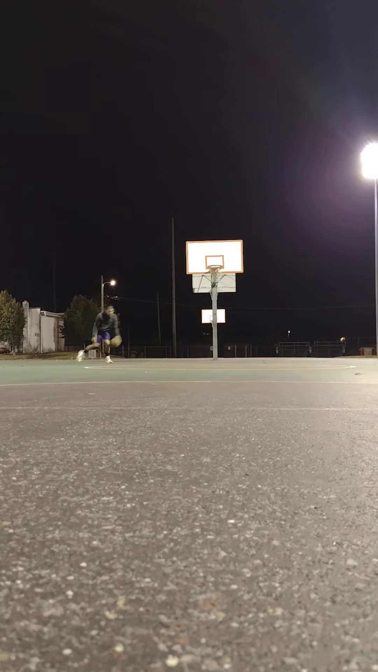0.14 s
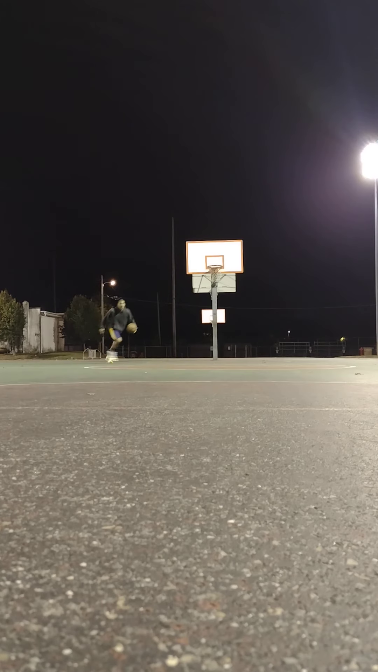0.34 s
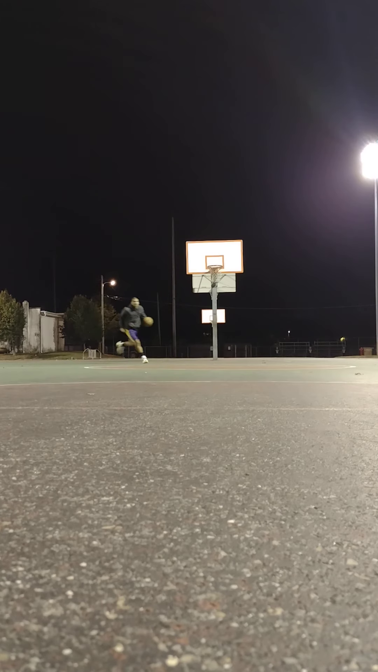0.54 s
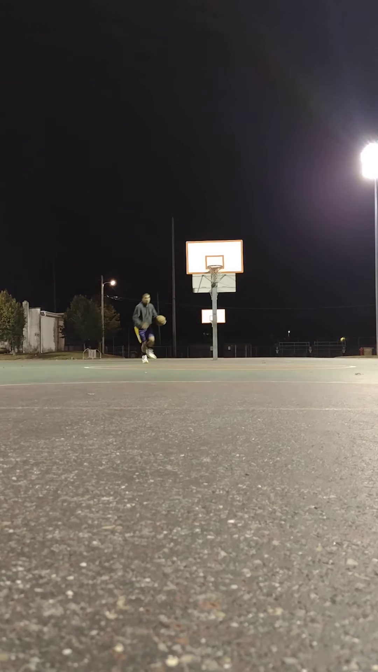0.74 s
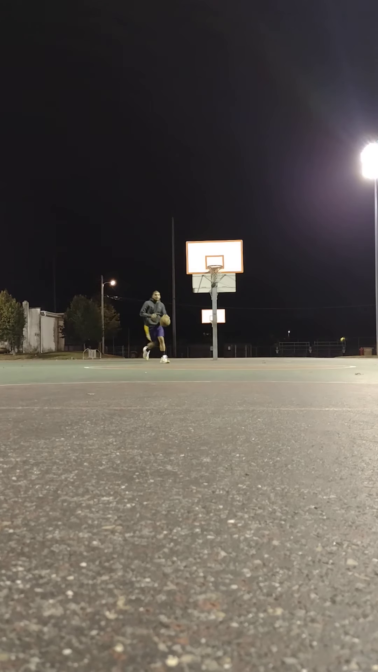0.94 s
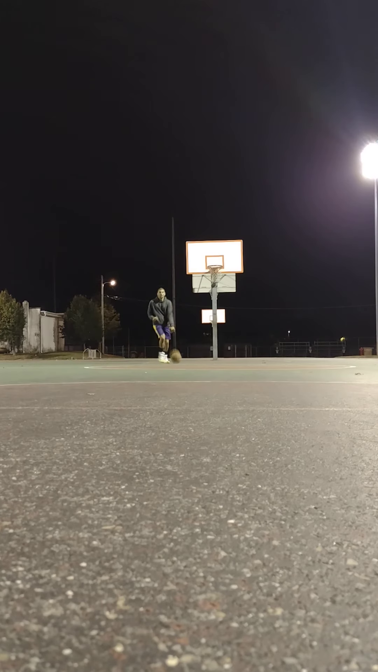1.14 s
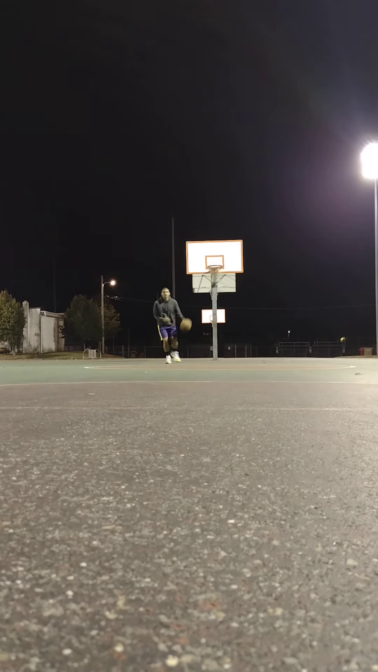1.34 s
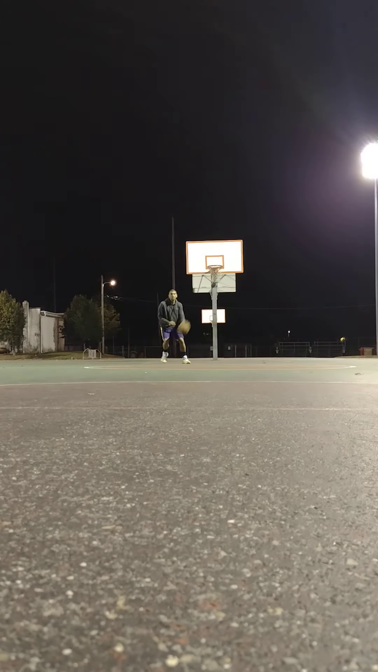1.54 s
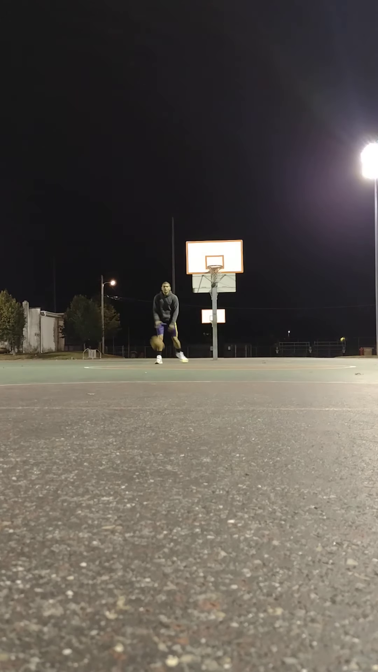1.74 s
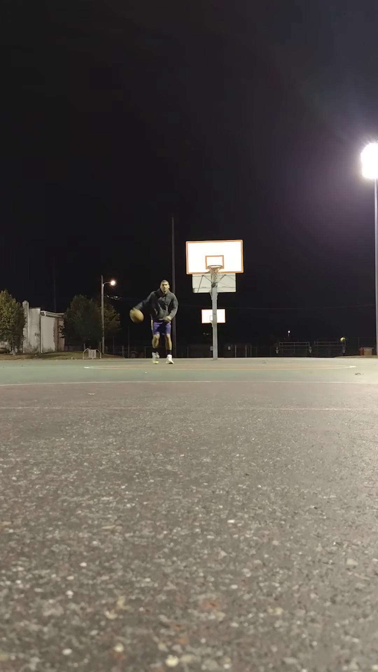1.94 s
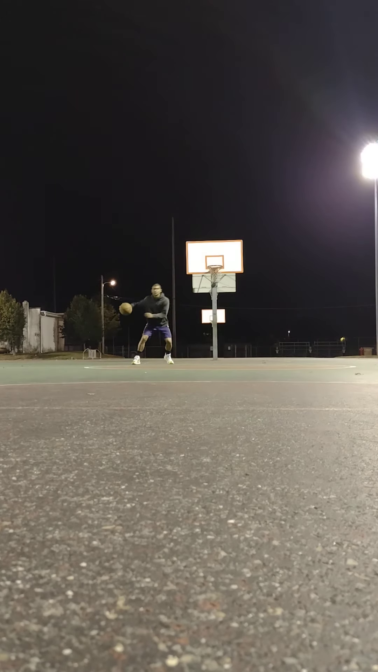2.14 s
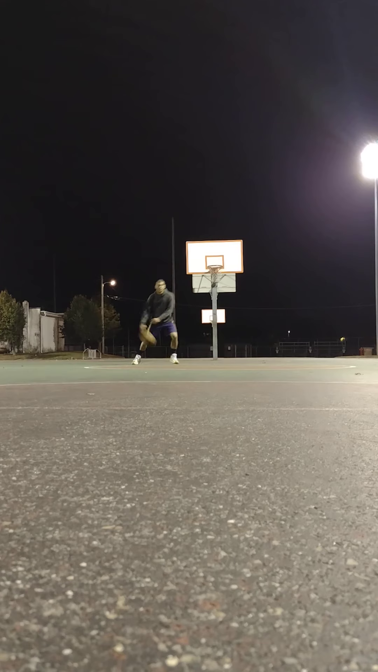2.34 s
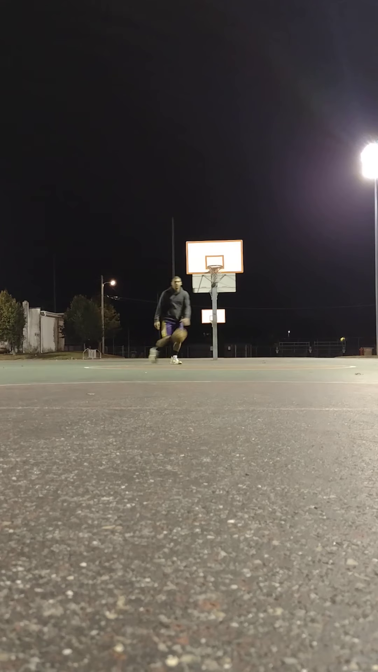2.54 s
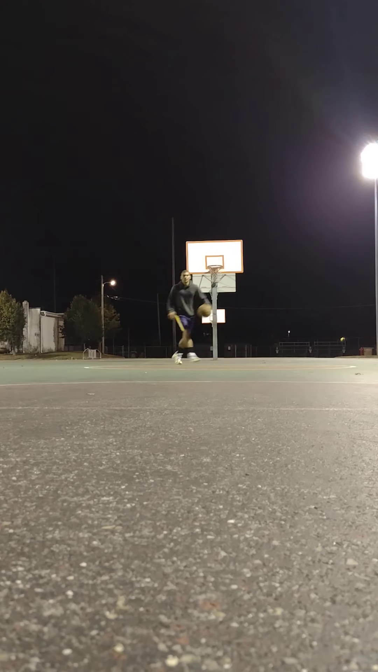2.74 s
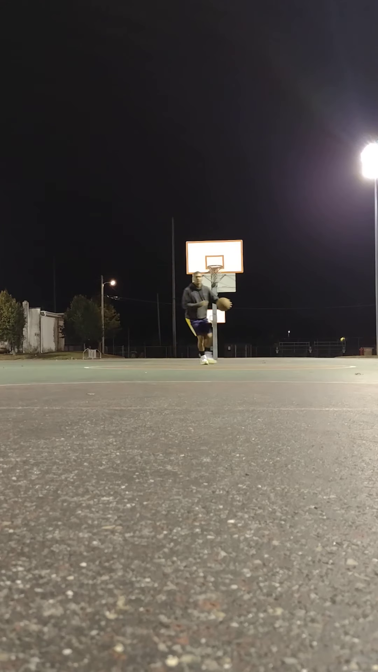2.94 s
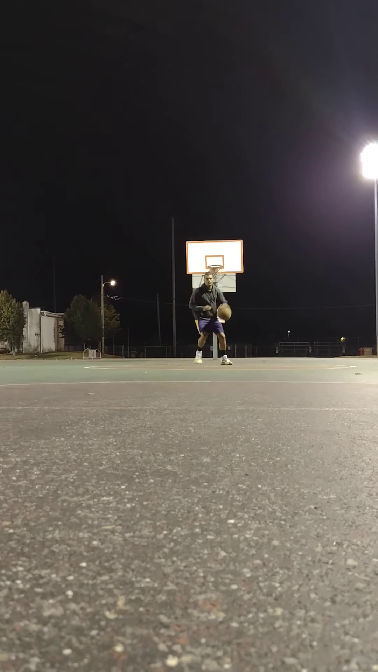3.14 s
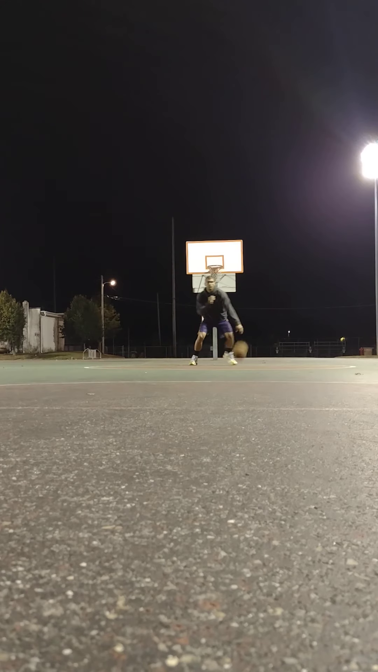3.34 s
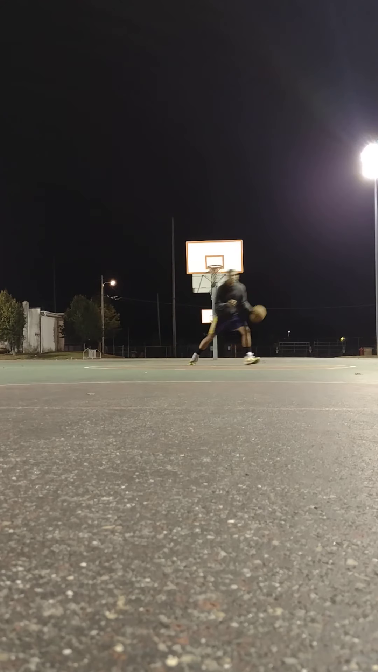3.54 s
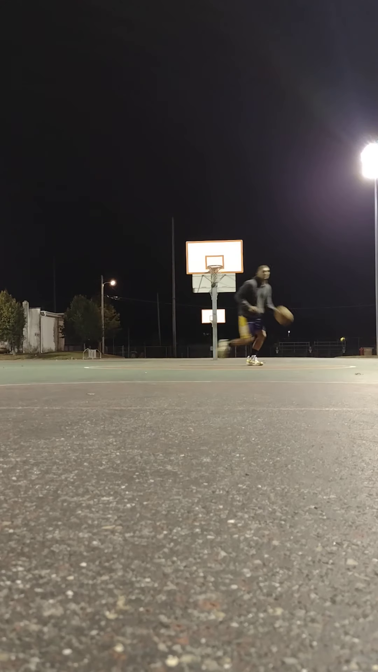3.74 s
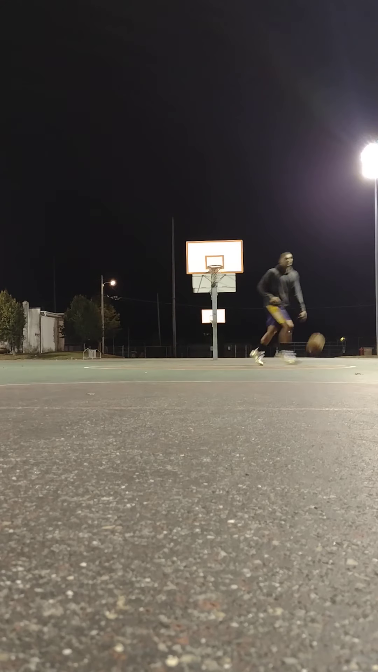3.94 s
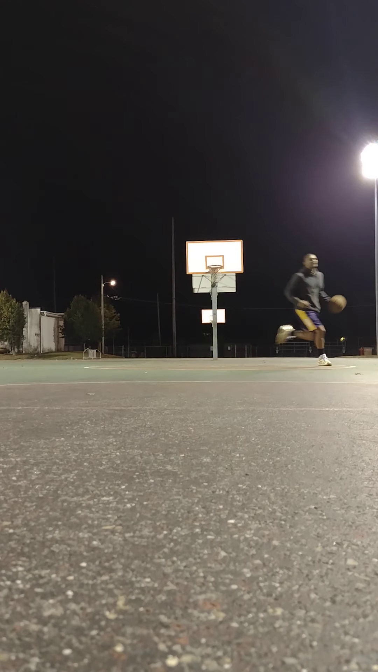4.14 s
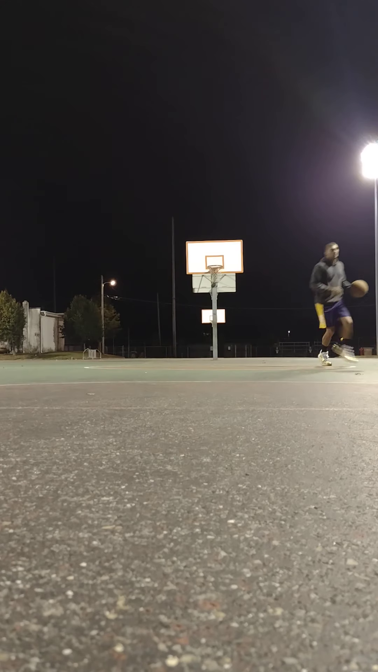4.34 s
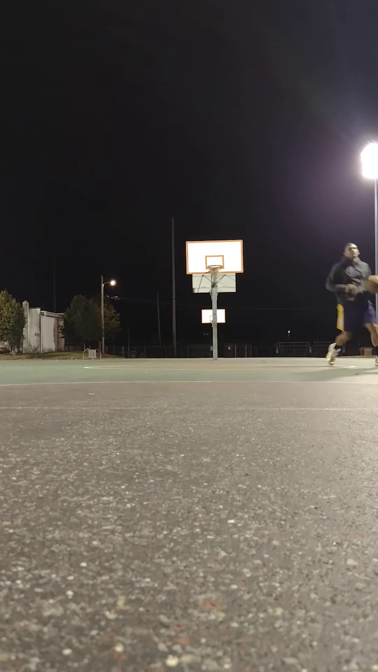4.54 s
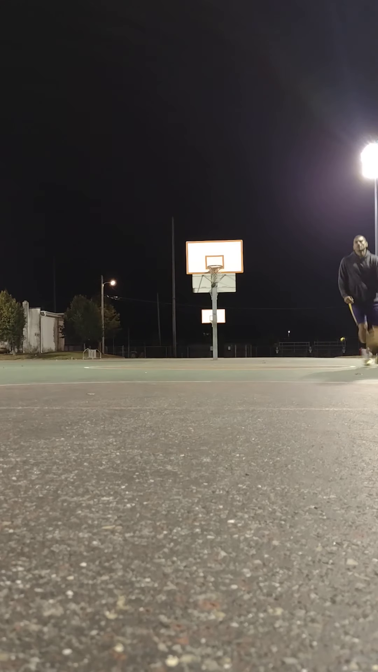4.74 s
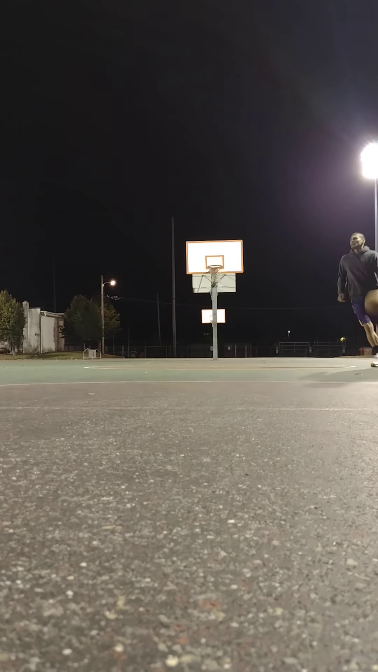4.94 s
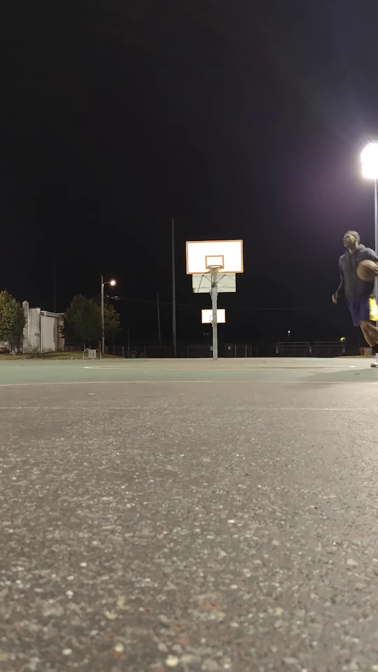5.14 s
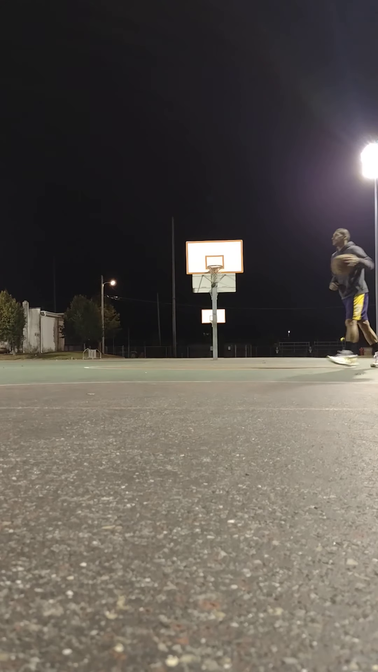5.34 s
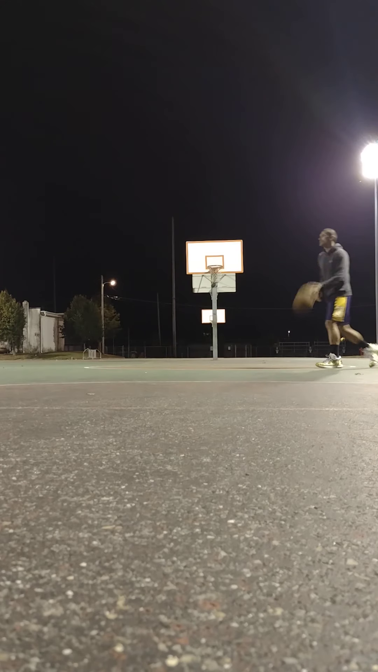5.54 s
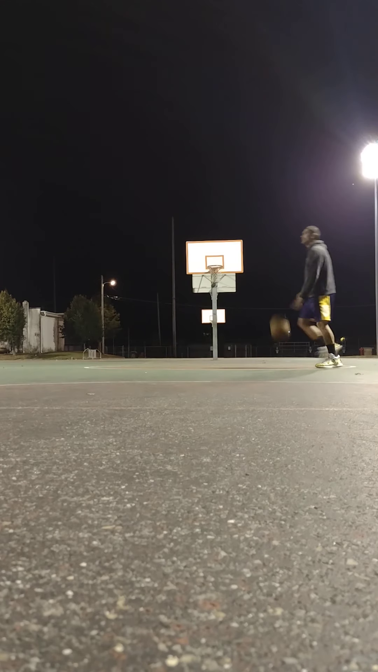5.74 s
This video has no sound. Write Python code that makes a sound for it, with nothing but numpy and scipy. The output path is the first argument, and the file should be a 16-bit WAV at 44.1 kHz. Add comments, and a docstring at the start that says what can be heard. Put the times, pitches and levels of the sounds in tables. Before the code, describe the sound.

One soft, dull bounce opens, then a pause of over a second before quicker basketball dribbles with thumping, ringing slaps. Shoes chirp in very short bursts during the footwork, strongest near 1.6, 2.2 and 3.35 seconds, then stop; later bounces are louder. A light hand slap comes late. Open court with reflections from fences and buildings, low traffic murmur, faint insect song and hiss; distant ground-level stereo pickup.

```python
"""An outdoor asphalt court at night: a basketball is dribbled some metres from a microphone on the ground.
Each bounce adds fading tones of the squashed ball and of the air in it to a smack and a falling crack.
Rubber soles squeak with wavering tones, scuff with short noise and tick on grit.
Fences and buildings send back echoes, made from delayed copies and fading noise.
Far traffic hums and insects sing, both made from filtered noise."""
import sys
import numpy as np
from scipy import signal
from scipy.fft import rfft, irfft, next_fast_len
from scipy.io import wavfile
from scipy.ndimage import uniform_filter1d, map_coordinates

SR = 44100
rng = np.random.default_rng(int(sys.argv[2]) if len(sys.argv) > 2 else 0)


def put_to_file(sound):
    """Save the sound as 16-bit audio at rate SR, in the file named by the first command-line argument."""
    columns = np.atleast_2d(sound).T  # one column per channel
    safe = np.clip(columns, -1, 1)
    whole_steps = np.round(safe * 32767)
    wavfile.write(sys.argv[1], SR, whole_steps.astype(np.int16))


def magnitude_from_level(level_db):
    """Linear magnitude for a level in decibels (20 dB per decade)."""
    exponent = np.asarray(level_db, float) / 20
    return 10 ** exponent


N = 259308  # samples, about 5.88 s

# How far traffic comes and goes. Each row: time in seconds, rumble level in dB, tyre roar level in dB.
TRAFFIC_LEVELS = [(0.0, -56, -56), (0.23, -50, -52), (0.6, -55, -58.5), (1.46, -51.5, -53.5),
                  (1.67, -57, -57.5), (2.21, -54.5, -56), (2.7, -57.5, -57.5), (3.31, -55, -56),
                  (4.22, -56.5, -59), (4.63, -60, -60.5), (4.93, -57, -59), (5.34, -58.5, -60),
                  (5.88, -55, -61)]
# Tone colour of the low rumble. Each row: frequency in Hz, relative level in dB per Hz.
RUMBLE_SPECTRUM = [(12, -50), (20, -21.5), (83, -1.5), (107, -1), (168, -2.5), (258, -6), (357, -25),
                   (400, -18), (520, -49), (880, -120)]
# Tone colour of the tyre roar. Each row: frequency in Hz, relative level in dB per Hz.
ROAR_SPECTRUM = [(180, -28), (300, -4.5), (451, -4.5), (522, -6.5), (565, -7.5), (707, -4), (1210, -7),
                 (3530, -28.5), (4410, -32), (7000, -45.5), (9100, -76.5), (15400, -120)]
# How alike left and right are in spread-out sound. Each row: frequency in Hz, likeness from 0 to 1.
LEFT_RIGHT_LIKENESS = [(30, .975), (130, .99), (290, .98), (640, .89), (1400, .72), (3100, .25), (6800, 0)]
# Tone colour of the microphone noise. Each row: frequency in Hz, relative level in dB per Hz.
HISS_SPECTRUM = [(1500, -120), (3000, -4.5), (6000, -1), (9000, -3), (12000, -6.5), (16000, -4)]

# Ball blows on the ground, all strengths relative. Each row: start in seconds, squash in dB,
# squash overtone in dB, ring in dB, crack in dB, brightness in dB.
BOUNCES = [(0.1673, -32.5, -5, -43, -42, -24), (1.317, -27.5, 3.5, -37, -33, 2),
           (1.837, -28.5, 3.5, -37.5, -32, -1.5), (2.5896, -30, 2, -40.5, -32.5, -5.5),
           (3.4716, -24, 1, -33.5, -23, -7.5), (4.008, -26.5, 2.5, -34.5, -36.5, 8),
           (4.8927, -21.5, 4, -28, -30, 2.5), (5.78, -24, -8, -34, -25.5, -9)]
# A hand's blow on the ball. One row: squash in dB, squash overtone in dB, ring in dB, crack in dB,
# brightness in dB, how many times quicker than a bounce.
PALM_BLOW = (-34, -2.5, -50, -36.5, -18, 2.81)
PALM_TIME = 4.6177  # seconds
# The ball squashing. Each row: frequency in Hz, relative level in dB, time to fade by 60 dB in seconds;
# a quicker blow raises the frequency and shortens the fade.
SQUASH_MODES = [(101.27, 1.5, 0.073), (228, -4, 0.0706), (338.7, -20.5, 0.11)]
# Air ringing in the ball, before small random changes. Each row: frequency in Hz, relative level in dB,
# time to fade by 60 dB in seconds.
AIR_MODES = [(451, -13.5, 0.049), (751.4, -1.5, 0.01667), (1028, -13, 0.042), (1164.6, -1.5, 0.019),
             (1712, -0.5, 0.0097), (2294, -8, 0.017)]
# Dull slaps after a bounce: wall echoes, and at 1.9023 s probably a footstep. Each row: time in seconds
# (they start 1 ms earlier), level against the bounce in dB before dulling.
DULL_SLAPS = [(.198, -8), (1.343, -12.5), (1.864, -10.5), (1.9023, -8), (2.624, -8.5), (4.062, -13.5),
              (4.926, -19.5), (5.806, -28)]
# Long thin tones after some bounces. Each row: frequency in Hz, relative level in dB.
THIN_TONES = [(2810, 0), (5860, -16)]
# Faint thin tones after some bounces; the one from 4.897 s stops suddenly, perhaps at a catch.
# Each row: start in seconds, length in seconds, starting level in dB.
THIN_TONE_TIMES = [(.17, 0.079, -75.5), (2.6, 0.29, -77), (4.897, 0.26, -68), (5.79, 0.039, -80)]

# Where the player is. Each row: time in seconds, lead of the left port in microseconds,
# left-right level difference in dB before PORT_SHADING multiplies it.
PLAYER_POSITION = [(0, 34.6, 0.77), (3.3, 34, 0.8), (5.88, 7.9, 0.7)]
# The body of the recorder shades one port. Each row: frequency in Hz, multiplier of the left-right dB.
PORT_SHADING = [(200, 0.5), (700, 3.5), (1500, 4), (3000, 6.5), (6000, 0.56), (12000, 1.5)]
# How long scattered echoes last. Each row: frequency in Hz, time to fade by 60 dB in seconds.
COURT_FADE = [(100, 0.847), (1000, 0.62), (4000, 1), (12000, 0.79)]

# Grit under a sole. Each row: start in seconds, peak level in dB before its quick onset, frequency in Hz.
TICKS = [(0.432, -56, 9030), (1.1883, -58, 9080), (2.0192, -47, 9200), (2.1874, -65, 11450),
         (2.1928, -49, 9080), (2.7094, -58.5, 9300), (2.9896, -55.5, 8574), (4.176, -50.5, 3500),
         (5.845, -67.5, 3500)]
# Soles dragging. Each row: start in seconds, length in seconds, level in dB before fading in and out,
# centre frequency in Hz.
SCUFFS = [(1.082, 0.0131, -63, 2840), (2.396, 0.066, -60, 8300), (2.556, 0.033, -56, 6760),
          (3.136, 0.098, -65, 4680), (3.681, 0.0556, -61.5, 5140)]
# A sole bites, swells and lets go. Each row: start in seconds, length in seconds, peak level in dB,
# first frequency in Hz, last frequency in Hz, roughness from 0 to 1.
SQUEAKS = [(1.401, 0.019, -43, 4450, 4422, 0.4), (1.58, .042, -25, 3177, 3494, 0.6),
           (2.097, 0.028, -38.5, 4664, 3481, 0.47), (2.246, 0.0427, -28, 3507, 3278, .8),
           (2.375, 0.046, -49.5, 4200, 3208, 0.6), (3.197, .029, -33, 3059, 3817, 0.54),
           (3.35, 0.04566, -23, 3453, 3317, .8), (3.484, 0.0519, -42.5, 3400, 4590, 0.8)]
# The sole slides on faintly. Each row: start in seconds, length in seconds, peak level in dB,
# first frequency in Hz, last frequency in Hz, roughness from 0 to 1.
SLIDES = [(1.44, 0.0756, -60.5, 4540, 4510, .15), (1.55, .03, -70.5, 8600, 8700, 0.146),
          (1.63, 0.0624, -49.5, 3750, 3710, 0.98), (2.41, 0.028, -53.5, 3584, 2843, 0.654),
          (2.44, 0.12, -63, 3960, 3822, 0.79), (3.525, .025, -45, 4510, 4440, 0.99),
          (3.572, 0.0442, -53, 4480, 3727, 0.207)]
# Swell of a squeak. One row: share of the length before the peak, rise in dB, sharpness, fall in dB.
SQUEAK_SWELL = (0.625, 36.94, 3.216, 28)
# Swell of a slide. One row: share of the length before the peak, rise in dB, sharpness, fall in dB.
SLIDE_SWELL = (.15, 6, 1.5, 12)
# Wall echoes of the squeaks. Each row: delay in seconds, level in dB before random changes.
WALL_ECHOES = [(.022, -23), (.031, -23), (.05, -26.5), (.068, -29), (.09, -33)]


def unit(x):
    """Scales a sound to an rms (average strength) of 1."""
    return x / np.sqrt(np.mean(x ** 2) + 1e-20)


def along(points, hz):
    """Reads a (Hz, value) curve on a logarithmic frequency axis."""
    f, v = np.transpose(points)
    return np.interp(np.log(hz + 1), np.log(f + 1), v)


def at(points, s):
    """Reads every column after the time column, at the times s."""
    times, *cols = np.transpose(points)
    return [np.interp(s, times, c) for c in cols]


def wobble(rate, size=N):
    """A smooth random curve with the given number of random points a second."""
    points = rng.standard_normal(int(size * rate / SR) + 4)
    return map_coordinates(points, [np.arange(size) * rate / SR])


def filtered(x, response):
    """Shapes a sound by a complex response that depends on frequency."""
    m = next_fast_len(x.shape[-1] + 4096)
    return irfft(rfft(x, m) * response(np.fft.rfftfreq(m, 1 / SR)), m)[..., :x.shape[-1]]


def rush(spectrum, patchy_db):
    """Stereo noise of rms 1, with louder and softer patches across time and frequency."""
    z = signal.stft(rng.standard_normal((2, N)), nperseg=512)[2]
    patches = uniform_filter1d(rng.standard_normal(z.shape[1:]), size=5, axis=0)
    patches = uniform_filter1d(patches, size=10, axis=1)
    pair = signal.istft(z * magnitude_from_level(patchy_db * unit(patches)), nperseg=512)[1][:, :N]

    def middle_and_side(hz):
        # this angle gives left and right the wanted likeness
        angle = np.arccos(np.clip(along(LEFT_RIGHT_LIKENESS, hz), -1, 1)) / 2
        return magnitude_from_level(along(spectrum, hz)) * [np.cos(angle), np.sin(angle)]

    mid, side = filtered(pair, middle_and_side)
    return unit(np.array([mid + side, mid - side]))


def night():
    """Far traffic in two noise layers, and a narrow band of insect song stronger on the left."""
    rumble_db, roar_db = at(TRAFFIC_LEVELS, np.arange(N) / SR)
    rumble = magnitude_from_level(rumble_db + 0.83 * wobble(9.8)) * rush(RUMBLE_SPECTRUM, patchy_db=1.5)
    roar_db = roar_db + 0.8 * wobble(5.7)
    roar = magnitude_from_level(roar_db) * rush(ROAR_SPECTRUM, patchy_db=1.6763)
    roar = roar * magnitude_from_level([[0.6], [-0.6]])  # slightly stronger on the left
    song = filtered(rng.standard_normal((2, N)), lambda hz: 1 / (1 + ((hz - 4380) / 190) ** 2))
    song = magnitude_from_level(-79 + 1.4 * wobble(25)) * unit(song) * magnitude_from_level([[2.5], [-2.5]])
    return rumble + roar + song


def court(x, near_db, far_db):
    """Scattered echoes off near fences and a spread-out fading tail, drawn anew for every sound."""
    hz, t, z = signal.stft(rng.standard_normal((2, SR // 2)), SR, nperseg=256)
    alike = np.clip(along(LEFT_RIGHT_LIKENESS, hz), 0, 1)[:, None]
    z[1] = alike * z[0] + np.sqrt(1 - alike ** 2) * z[1]
    fade = magnitude_from_level(-60 * t / along(COURT_FADE, hz)[:, None])
    build_up = np.clip(t / 0.03, 0, 1) ** 2
    tail = signal.istft(z * fade * build_up, SR, nperseg=256)[1]
    tail *= magnitude_from_level(far_db) / np.linalg.norm(tail[0])
    # 30 fence echoes, 20 to 105 ms late, with random strength and sign
    taps = rng.random((30, 3))
    where = ((0.02 + 0.085 * taps[:, 0]) * SR).astype(int)
    size = magnitude_from_level(near_db - 14 * taps[:, 1]) * np.sign(taps[:, 2] - 0.5)
    tail[0, where] += size
    tail[1, where + rng.integers(-2, 3, len(where))] += size
    return signal.fftconvolve(x[None], tail, axes=1)


def add(out, s, x, echoes):
    """Places a sound and its echoes; the direct sound is louder and earlier at the left port."""
    start = int(s * SR)
    lead_us, pan_db = at(PLAYER_POSITION, s)
    side = np.array([[0.5], [-0.5]])
    late = s - start / SR - side * lead_us * 1e-6  # includes the part of a sample lost in start

    def port(hz):
        return magnitude_from_level(side * pan_db * along(PORT_SHADING, hz)) * np.exp(-2j * np.pi * hz * late)

    direct = filtered(np.array([x, x]), port)
    for part in direct, echoes:
        room = out[:, start:start + part.shape[1]]
        room += part[:, :room.shape[1]]


NO_ECHO = np.zeros((2, 1))


def blow(squash_db, overtone_db, ring_db, crack_db, bright_db, quick=1):
    """One blow: squash tones, a smack, air tones, and a crack that sweeps down as the contact patch widens."""
    t = np.arange(SR // 5) / SR
    # the squash modes crest together when the ball is flattest
    # a weak second mode leaves more to the third
    thump = 0
    for (hz, db, t60), extra_db in zip(SQUASH_MODES, (0, overtone_db, -overtone_db)):
        fade = magnitude_from_level(db + extra_db - 60 * quick * t / t60)
        thump = thump + fade * np.cos(2 * np.pi * hz * (quick * t - 0.0041))
    thump -= 1.137 * np.exp(-((t - 0.0012) / 0.00077) ** 2)  # sharp pressure dip at first touch
    thump = magnitude_from_level(squash_db + 0.5) * thump * (1 - np.exp(-t / 0.00034))

    ring = 0
    for hz, db, t60 in AIR_MODES:
        fade = magnitude_from_level(db + rng.normal(0, 1.5) - 60 * t / t60)
        ring = ring - fade * np.sin(2 * np.pi * hz * rng.normal(1, 0.012) * t)
    ring = magnitude_from_level(ring_db + 10) * ring * (1 - np.exp(-(t / 0.00064) ** 2))

    noise = rng.standard_normal(len(t))
    smack = unit(filtered(noise, lambda hz: hz / 400 / (1 + (hz / 1300) ** 4)))
    smack_level = magnitude_from_level((squash_db + ring_db) / 2 - 4.5 - 60 * t / 0.0511)
    body = ring + smack_level * smack * (1 - np.exp(-t / 0.00015))

    sweep_hz = 2700 + 11000 * np.exp(-t / 0.0006)
    shape = (magnitude_from_level(bright_db - 13) + (t / 0.001524) ** 2) * np.exp(-(t / 0.001319) ** 1.502)
    crack = shape * np.sin(2 * np.pi * np.cumsum(sweep_hz) / SR + rng.normal(0, 1))
    hush = filtered(rng.standard_normal(len(t)), lambda hz: 1 / (1 + (hz / 6000) ** 2))
    hush = magnitude_from_level(-11.5 - 60 * t / 0.021) * hush * (t > 0.0012)
    crack = magnitude_from_level(crack_db + 10) * (crack + hush)

    # the skin peels off the asphalt with a weaker, duller knock 13 ms later
    peel = np.pad(body + 0.3 * crack, (round(0.013 * SR), 0))[:len(t)]
    peel = magnitude_from_level(-9.5) / quick ** 2 * filtered(peel, lambda hz: 1 / (1 + 1j * hz / 2500))
    return thump + body + crack + peel


def ball():
    """Every bounce and the hand's blow with echoes, dull slaps soon after, and faint thin tones."""
    out = np.zeros((2, N))

    def dulling(hz):
        return (0.59 + 1j * hz / 900) / (1 + 1j * hz / 900) / (1 + 1j * hz / 4000) ** 3

    for s, *strength in BOUNCES + [(PALM_TIME, *PALM_BLOW)]:
        x = blow(*strength)
        add(out, s, x, court(x, near_db=-27.0, far_db=-18.5))
        dull = filtered(x, dulling)
        for late, db in DULL_SLAPS:
            if 0 < late - s < 0.1:  # the slap follows this blow within 0.1 s
                add(out, late - 0.001, -magnitude_from_level(db) * dull, NO_ECHO)
    for s, length, db in THIN_TONE_TIMES:
        t = np.arange(round(length * SR)) / SR
        ping = 0
        for hz, level in THIN_TONES:
            ping = ping + magnitude_from_level(level + 1.04 * wobble(27.7, len(t))) * np.sin(2 * np.pi * hz * t)
        add(out, s, magnitude_from_level(db - 14.2 * t) * ping * signal.windows.tukey(len(t), 0.15), NO_ECHO)
    return out


def ticks():
    """Grit under a sole: tiny bright tones that waver and die within milliseconds."""
    out, t = np.zeros((2, N)), np.arange(400) / SR
    for s, db, hz in TICKS:
        tone = np.sin(2 * np.pi * hz * t + 1.0 * wobble(3000, len(t)))
        x = magnitude_from_level(db - 60 * t / 0.0127) * tone * (1 - np.exp(-t / 0.00027))
        add(out, s, x, court(x, near_db=-28, far_db=-13.5))
    return out


def scuffs():
    """Soles drag over the ground: short uneven noise around one broad pitch."""
    out = np.zeros((2, N))
    for s, length, db, hz in SCUFFS:
        size = round(length * SR)
        uneven = rng.standard_normal(size) * magnitude_from_level(4.6 * wobble(460, size))
        x = unit(filtered(uneven, lambda f: 1 / (1 + (0.9 * (f / hz - hz / (f + 1))) ** 2)))
        x = magnitude_from_level(db) * x * np.hanning(size)
        add(out, s, x, court(x, near_db=-19.5, far_db=-11.0))
    return out


def squeal(s, length, peak_db, first_hz, last_hz, grain, swell):
    """Rubber sticks and slips thousands of times a second; rougher means more strands, throb and grit."""
    size = round(length * SR)
    peak, rise_db, sharp, fall_db = swell
    u = np.arange(size) / size  # share of the squeal that has passed
    before_peak = np.clip(1 - u / peak, 0, 1) ** sharp
    after_peak = np.clip((u - peak) / (1 - peak), 0, 1) ** sharp
    db = peak_db - rise_db * before_peak - fall_db * after_peak

    hz = first_hz + (last_hz - first_hz) * u
    rough = np.clip(grain + 0.35 * (1 - u) ** 2, 0, 1)  # extra roughness before the grip settles
    octave_db = -21 + 9.5 * rough + 3 * wobble(170, size)  # the octave grows with roughness
    # three ribs of the tread, detuned and joining in with roughness
    tone = 0
    for detune, share in (-0.011, 0.63), (-0.13, 0.6 * rough ** 2), (0.12, 0.5 * rough ** 2):
        waver = (0.013 + 0.055 * rough) * wobble(798.3, size)
        phase = 2 * np.pi * np.cumsum(hz * (1 + detune * rough + waver)) / SR
        rib = np.sin(phase) + magnitude_from_level(octave_db) * (np.sin(2 * phase) + 0.17 * np.sin(3 * phase))
        throb = 1 + (0.45 + 0.19 * rough) * np.tanh(1.7 * wobble(340.5, size))
        tone = tone + share * rib * throb

    def grit_colour(f):
        return (f / 2300) ** 3 / (1 + (f / 2300) ** 3) / (1 + (f / 9000) ** 3)

    grit = unit(filtered(rng.standard_normal(size), grit_colour))
    mix = unit(tone) + magnitude_from_level(-21.5 + 11.3 * rough) * grit
    return magnitude_from_level(db) * mix * signal.windows.tukey(size, 0.15)


def squeaks():
    """Every squeak and slide of a sole, with court echoes and wavering copies off the walls."""
    out = np.zeros((2, N))
    for rows, swell in (SQUEAKS, SQUEAK_SWELL), (SLIDES, SLIDE_SWELL):
        for row in rows:
            s, x = row[0], squeal(*row, swell)
            add(out, s, x, court(x, near_db=-45, far_db=-23))
            for delay, wall_db in WALL_ECHOES:
                wall_db = wall_db + rng.normal(0, 2.5)
                add(out, s + delay, magnitude_from_level(wall_db + 4.1 * wobble(200, len(x))) * x, NO_ECHO)
    return out


def scene():
    """Night, ball and shoes together."""
    return night() + ball() + ticks() + scuffs() + squeaks()


def top_cut(x):
    """Nothing passes above the cut-off."""
    return signal.sosfilt(signal.butter(12, 16540, fs=SR, output="sos"), x)


def record(dry):
    """The microphone cuts the deep bass, softens the top and adds hiss."""
    noise = rng.standard_normal((2, N))
    hiss = magnitude_from_level(-80.0) * unit(filtered(noise, lambda hz: magnitude_from_level(along(HISS_SPECTRUM, hz))))

    def microphone(hz):
        bass_cut = 1j * hz / (30 + 1j * hz)
        return bass_cut / (1 - (hz / 11500) ** 2 + 1.4j * hz / 11500)

    mix = filtered(dry, microphone) + hiss
    return top_cut(mix)


dry = scene()
out = record(dry)
put_to_file(out)
```